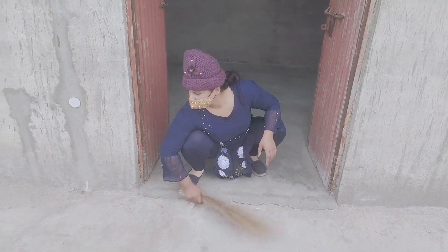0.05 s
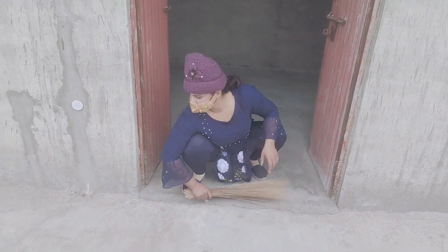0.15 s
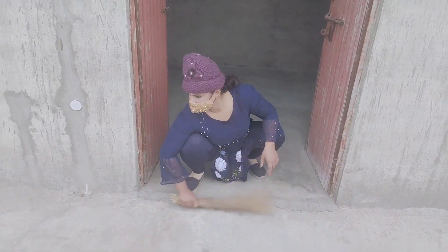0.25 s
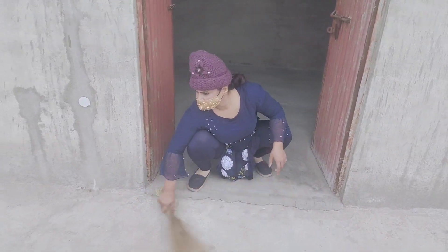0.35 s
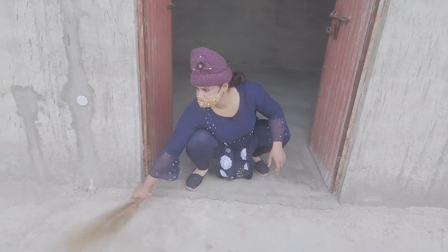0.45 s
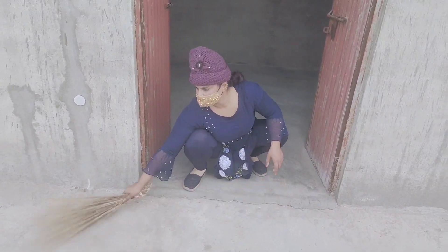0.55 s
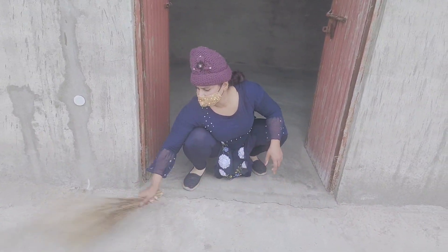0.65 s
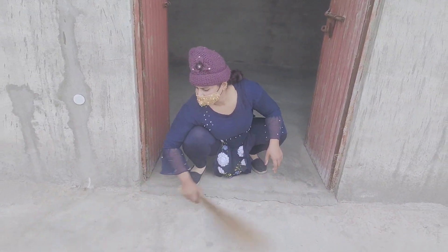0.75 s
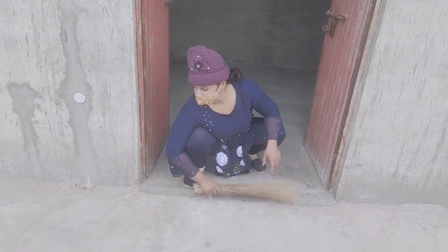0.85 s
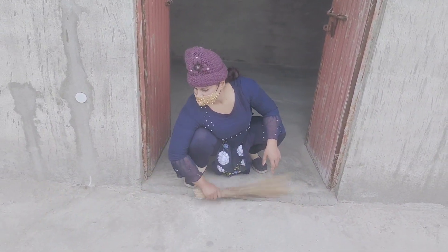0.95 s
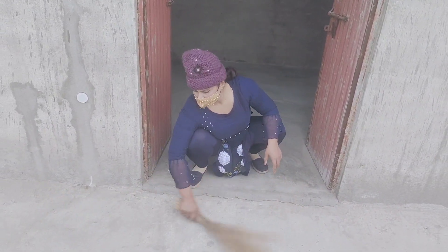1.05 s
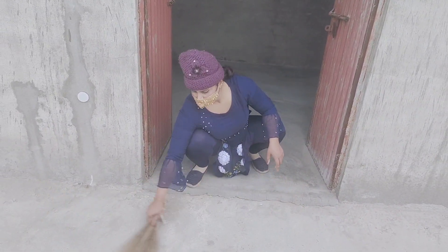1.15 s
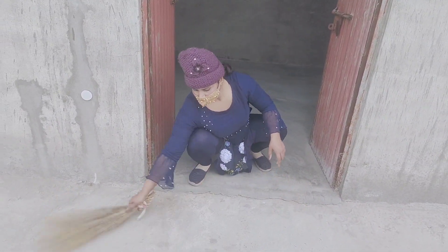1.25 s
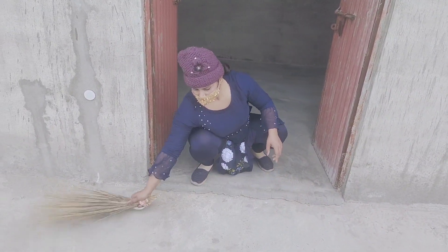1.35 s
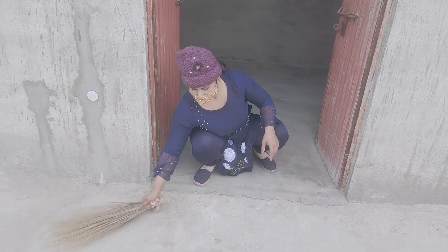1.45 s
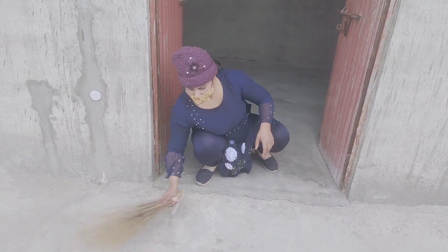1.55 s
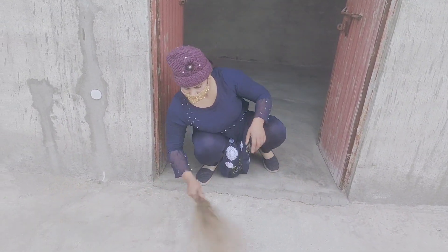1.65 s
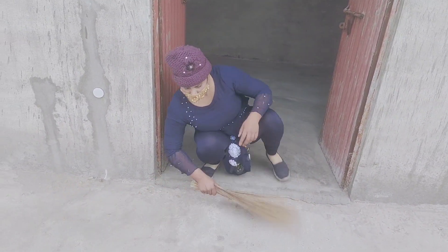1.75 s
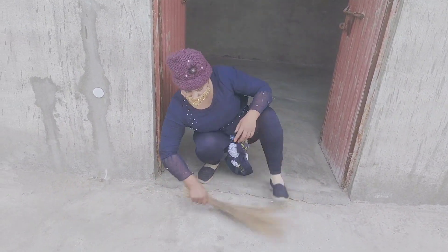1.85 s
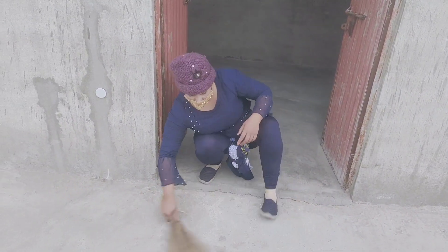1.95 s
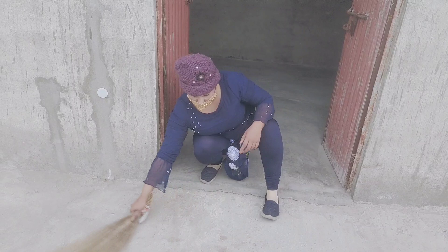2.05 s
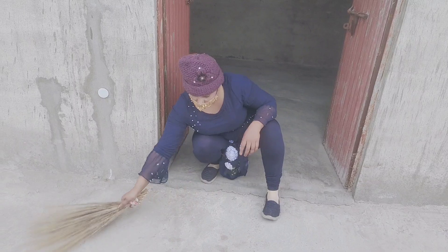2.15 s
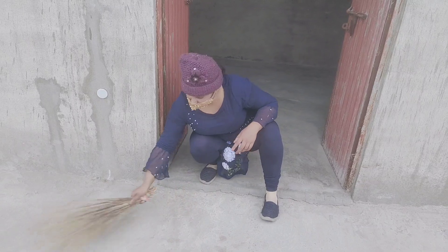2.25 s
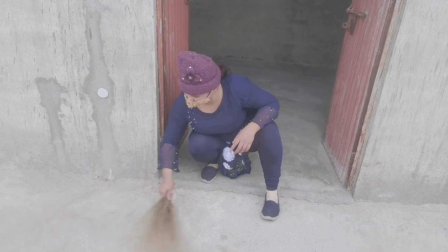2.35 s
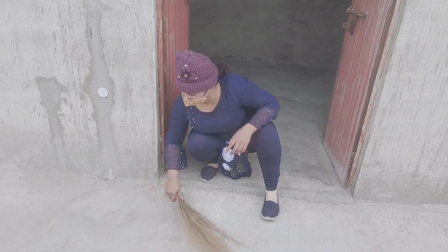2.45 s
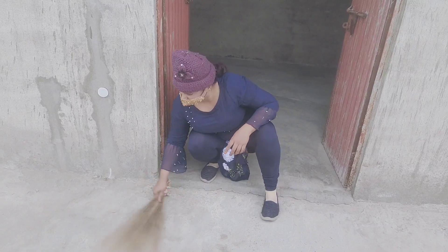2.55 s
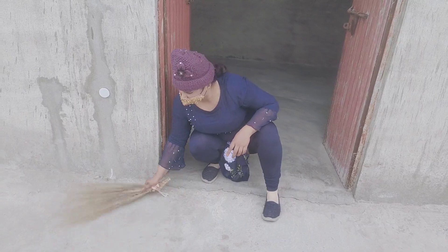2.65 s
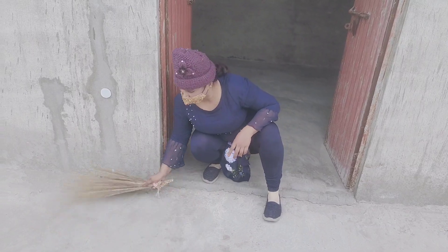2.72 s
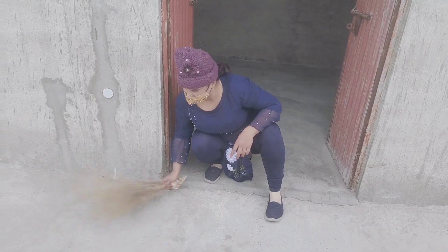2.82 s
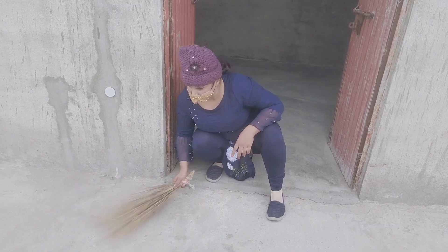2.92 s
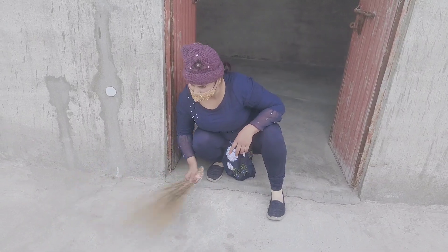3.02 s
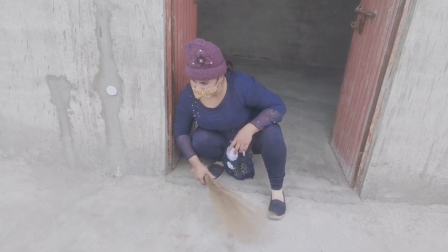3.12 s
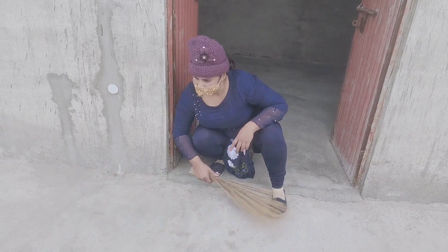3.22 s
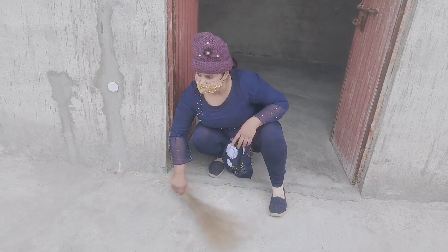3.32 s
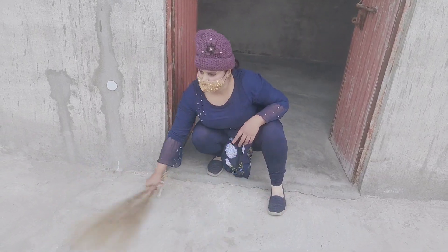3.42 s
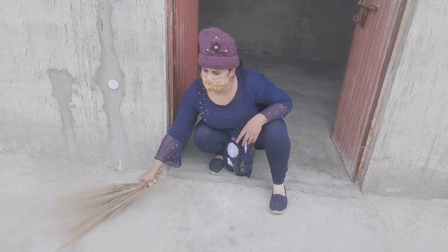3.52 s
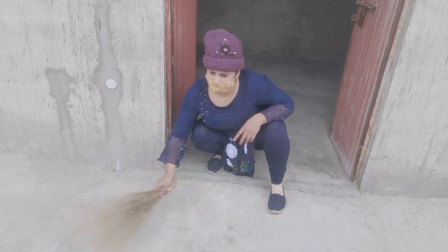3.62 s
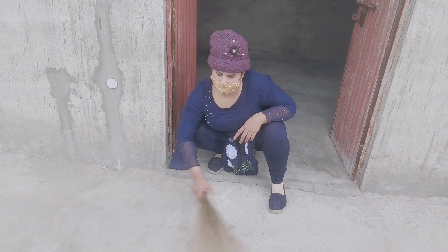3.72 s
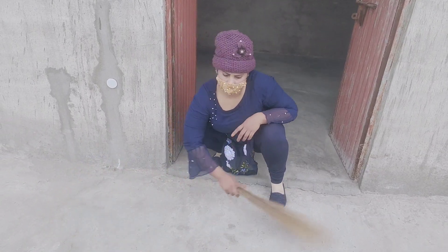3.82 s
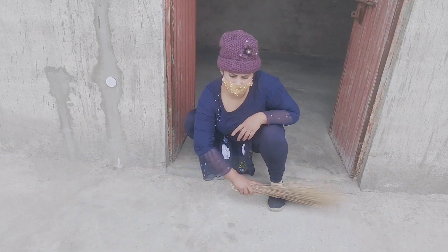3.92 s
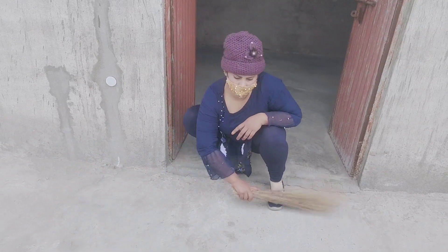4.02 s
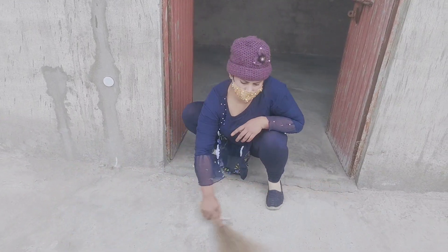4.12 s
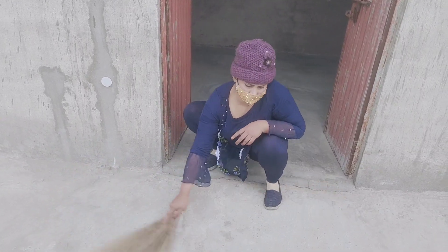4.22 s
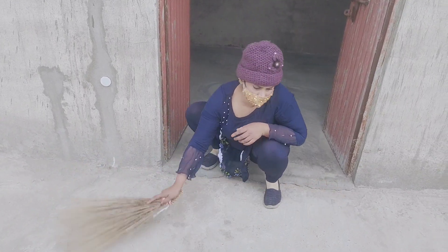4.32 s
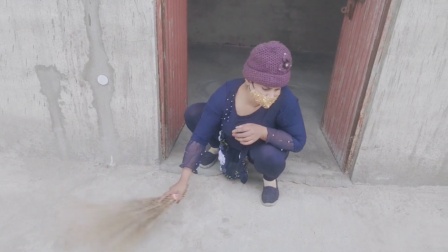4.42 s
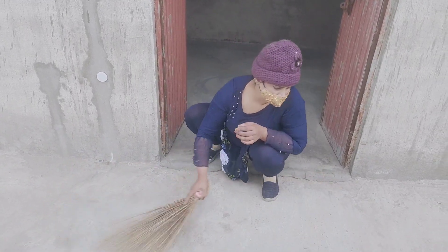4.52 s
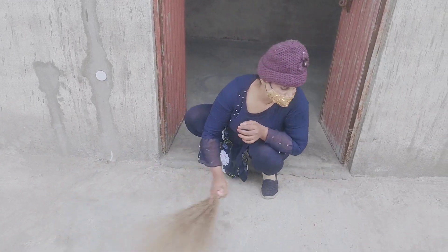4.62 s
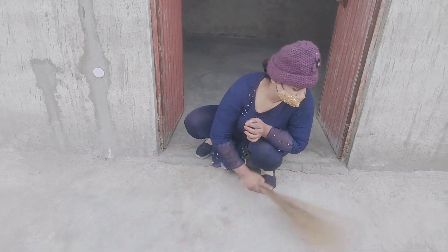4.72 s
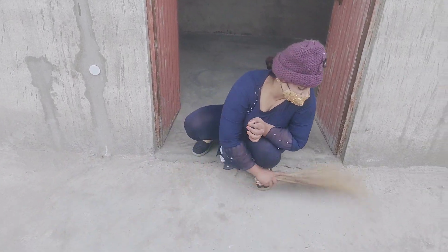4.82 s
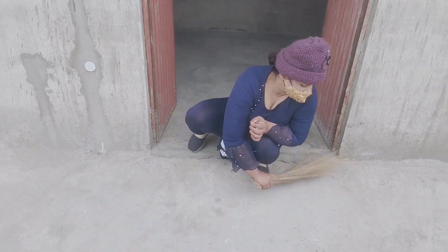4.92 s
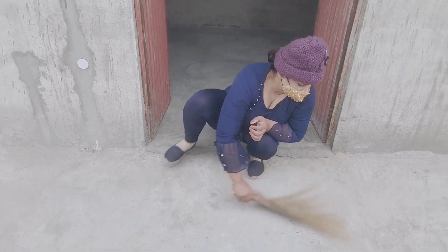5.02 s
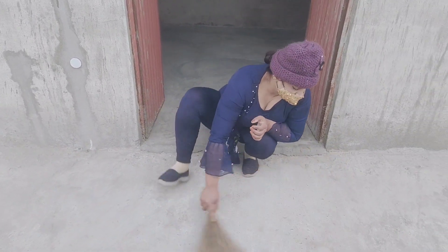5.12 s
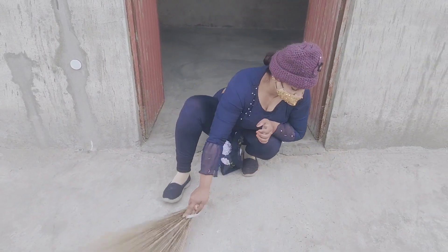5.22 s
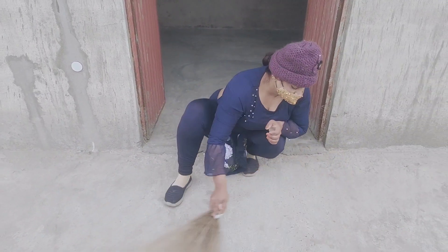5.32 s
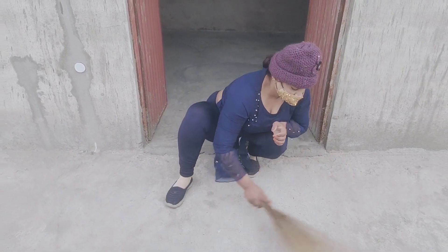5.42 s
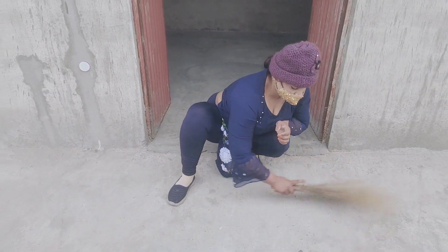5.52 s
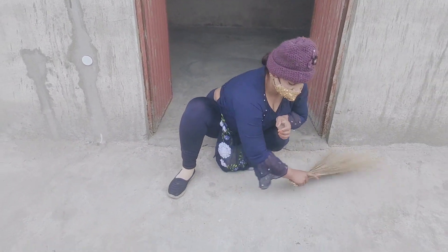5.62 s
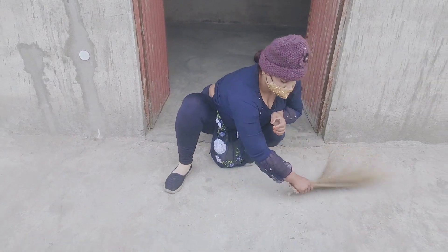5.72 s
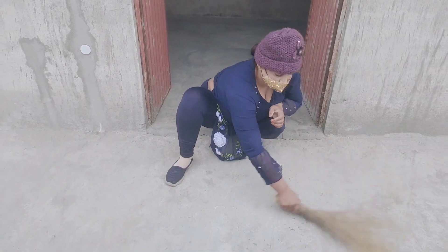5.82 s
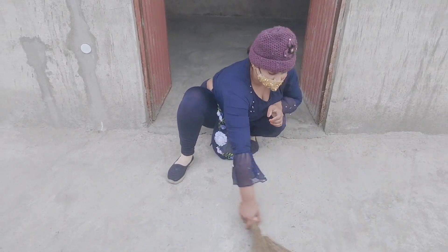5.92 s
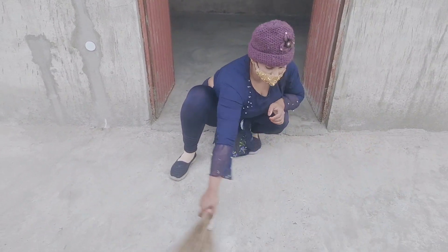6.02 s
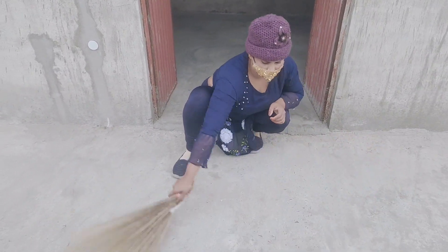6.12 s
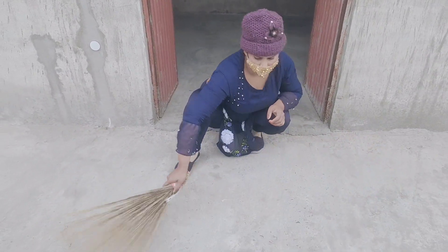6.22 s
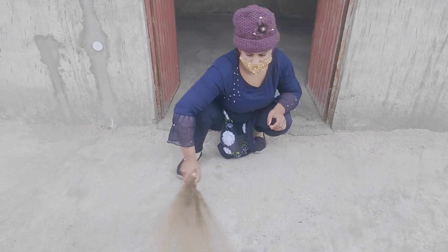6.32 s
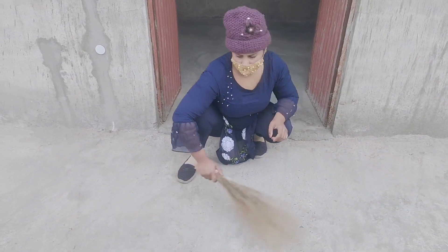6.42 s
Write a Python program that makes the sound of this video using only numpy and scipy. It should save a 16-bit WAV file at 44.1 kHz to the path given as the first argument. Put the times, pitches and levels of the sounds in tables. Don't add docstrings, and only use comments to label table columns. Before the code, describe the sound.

A hand broom of stiff twigs drags over gritty concrete by an open doorway, each stroke swelling from a light graze to a full hiss and rasp, then lifting away. Short crisp slaps and soft low scuffs fall between strokes. The stereo microphone is near, the broom slightly left, with brief wall echo, very quiet distant traffic, a wavering motor and small low wind bumps on the right.

```python
import sys
import numpy as np
from scipy import signal
from scipy.fft import rfft, irfft, next_fast_len
from scipy.io import wavfile
from scipy.ndimage import uniform_filter1d, map_coordinates

SR = 44100
rng = np.random.default_rng(int(sys.argv[2]) if len(sys.argv) > 2 else 0)


def waveform_to_disk(signal):
    frames = np.transpose(np.atleast_2d(signal))
    scaled = np.clip(frames, -1, 1) * 32767
    samples = np.round(scaled).astype(np.int16)
    wavfile.write(sys.argv[1], SR, samples)


def volts(x):
    e = np.asarray(x, float) / 20
    return 10 ** e


N = 284886

# f/Hz, density/dB per Hz
TOWN_SPECTRUM = [(15, -46), (25, -33), (72, -6.5), (113, 1.5), (450, -5.5), (574, -8), (693, -7.5),
                 (1440, -13.5), (1830, -13), (2980, -22.5), (3600, -23.5), (13500, -31), (14700, -29),
                 (15900, -51)]
# f/Hz, correlation
TOWN_LIKENESS = [(60, 0.92), (180, 0.99), (550, 0.46), (1650, -0.23), (4970, 0.047), (15000, -0.27)]
# t/s, f/Hz, level/dB
MOTOR_WHINE = [
    (0, 734, -63),
    (.6, 735, -60.5),
    (1.2, 708, -63),
    (1.6, 709, -58),
    (2.2, 700, -65),
    (3.2, 712, -68),
    (4.5, 703.6, -86),
    (6, 740, -78),
    (6.4, 760, -54),
]
# t/s, level/dB
GUSTS = [(0, -69), (.6, -71), (1, -61), (1.4, -64), (1.8, -73), (2.9, -69), (3.7, -70), (4.2, -58),
         (4.7, -69), (5, -79), (6, -78), (6.4, -68)]
# t/s, peak level/dB, f/Hz
WIND_POPS = [(0.088, -46, 117), (0.688, -47, 105), (0.929, -50, 125), (0.959, -53, 78.1), (0.999, -61, 214),
             (1.136, -40.5, 112), (4.179, -53, 94), (4.232, -43, 107), (4.516, -45, 132),
             (4.603, -42.5, 104), (4.731, -44, 103)]
# f/Hz, T60/s
WALL_T60 = [(200, 0.98), (2000, 0.64), (6000, 0.39), (14000, 0.25)]
CASING_ECHOES = [(5.2, -0.19), (6.1, 0.045)]

# f/Hz, width/Hz, level/dB
TIP_MODES = [(6870, 1120, 2), (10000, 2650, -2.5)]
# f/Hz, width/Hz, level/dB
GRIT_MODES = [(10540, 7000, -3), (13870, 1570, 4), (14630, 3400, -3)]
# f/Hz, width/Hz, level/dB
TWIG_MODES = [(1803, 200, -2), (2608, 324, 0.5), (3447, 810, 0), (5090, 2260, -3)]
# f/Hz, width/Hz, level/dB
BUNDLE_MODES = [(319, 158, -1), (744, 162, -2), (1390, 710, -3)]
# t/s, rms level/dB, f/Hz, length/s
THUDS = [(0.297, -39.5, 1140, 0.046), (0.311, -48, 262, 0.049), (1.043, -49.5, 297, 0.045),
         (1.067, -44.5, 1060, 0.054), (1.964, -43, 324, 0.053), (1.969, -44, 606, 0.063),
         (2.658, -48, 800, 0.042), (2.898, -49.5, 230, 0.045), (3.382, -52, 294, 0.045),
         (3.93, -52, 2600, .012), (5.128, -48, 328, 0.098), (5.863, -51.5, 390, .12)]

# touch-down t/s, graze level/dB, creep/dB per s,
# left-port lag at touch/samples, at lift/samples
TOUCHES = [
    (.159, -52.5, 53, 2, 4.7),
    (.874, -51, 21, -2, 5.5),
    (1.821, -57.5, 109, 1, 5.7),
    (2.459, -54, 31, 3.5, 4.6),
    (3.249, -55.5, 102, .5, 9.6),
    (3.956, -51, -40, -3.5, 3.8),
    (4.887, -54.5, 40, -4.5, 2.2),
    (5.635, -55, -23, -5, 3.4),
]
# crest after touch/s, crest level/dB, rise from -20 dB/s, fall to -20 dB/s
DRAGS = [
    (0.26, -30.5, 0.15, 0.17),
    (0.297, -30, 0.18, 0.19),
    (0.23, -31, 0.16, 0.17),
    (0.144, -31, 0.1, 0.135),
    (0.19, -30.0, 0.11, 0.109),
    (0.26, -32, 0.18, 0.15),
    (0.23, -29.5, 0.1353, 0.2),
    (0.4, -32.5, 0.3, 0.18),
]
# rise flatness, fall flatness (over 2: flat crest, steep flank), grit level/dB, twig level/dB
GRIPS = [(7.3, 3.9, 0.3, 0.51), (3.2, 3.75, -0.61, -0.18), (3.1, 3.1, 0.19, -0.064), (2.4, 5.6, 1.1, 0.86),
         (3.1, 2.5, 1.6, 1.4), (2.6, 3.85, -0.22, 0.99), (1.87, 2.42, -1.6, -0.43), (4.4, 2.7, -1.3, -0.87)]
# t/s, level/dB, grit level/dB, fade/dB per s, shiver level/dB
SLAPS = [
    (1.445, -27, 2, 450, -19),
    (2.892, -26, 3.5, 517, -19),
    (4.487, -34.5, 2.5, 344, -15.5),
]
# t/s, level/dB, half length/s
BRUSHES = [(.022, -64, .062), (.095, -68, .034), (1.432, -52.5, .024), (2.337, -62, .013),
           (2.448, -66, .027), (2.888, -57, .02), (3.164, -71, .013), (3.623, -51.5, .049),
           (4.484, -58, .012), (4.688, -65, .02), (6.313, -57.5, 0.029)]
GRIT_SHARES = [0.2, 2.5, -0.7, 3.5, 0, 3]
TWIG_SHARES = [0.53, -0.78, -1.1, 0.47, -1.2, 1.8]
BUNDLE_SHARES = [-12.5, -17, -10.5, -13.5, -17, -17]


def unit(x):
    return x / np.sqrt(np.mean(x ** 2) + 1e-20)


def along(points, hz):
    f, v = np.transpose(points)
    return np.interp(np.log(hz + 1), np.log(f + 1), v)


def curves(rows):
    s, *cols = np.transpose(rows)
    return [np.interp(np.arange(N) / SR, s, c) for c in cols]


def wobble(rate_hz):
    knots = rng.standard_normal(int(N * rate_hz / SR) + 4)
    return map_coordinates(knots, [np.arange(N) * rate_hz / SR])


def filtered(x, response):
    m = next_fast_len(N + 8192)
    return irfft(rfft(x, m) * response(np.fft.rfftfreq(m, 1 / SR)), m)[..., :N]


def resonances(modes, steep):
    low_hz = modes[0][0] * steep

    def response(f):
        total = 0
        for k, (center, width, db) in enumerate(modes):
            damping = 1j * f * width
            total = total + (-1) ** k * volts(db) * damping / (center * center - f * f + damping)
        return total * (1j * f / (low_hz + 1j * f)) ** 2

    return response


def patchy(x, depth_db, bins, frames):
    z = signal.stft(x, nperseg=512)[2]
    field = uniform_filter1d(rng.standard_normal(z.shape[1:]), bins, 0)
    field = uniform_filter1d(field, frames, 1)
    return signal.istft(z * volts(depth_db * unit(field)), nperseg=512)[1][:, :N]


def town():
    pair = patchy(rng.standard_normal((2, N)), depth_db=1.67, bins=2, frames=24)

    def mid_side(hz):
        turn = np.arccos(np.clip(along(TOWN_LIKENESS, hz), -1, 1)) / 2
        return volts(along(TOWN_SPECTRUM, hz)) * [np.cos(turn), np.sin(turn)]

    mid, side = filtered(pair, mid_side)
    traffic = volts(-54 + 0.61 * wobble(4.2)) * unit(np.array([mid + side, mid - side]))
    hz, db = curves(MOTOR_WHINE)
    phase = 2 * np.pi * np.cumsum(hz + 18 * wobble(45)) / SR
    whine = volts(db + 0.5 + 3.2 * wobble(14)) * np.sin(phase + [[0], [2.1]])
    return traffic + whine


def wind():
    lumps = volts(3 * np.array([wobble(8), wobble(8)])) * rng.standard_normal((2, N))
    gust_db, = curves(GUSTS)
    rumble = unit(filtered(lumps, resonances([(94, 29, 0)], 0.42)))
    out = volts(gust_db + [[-7], [0]]) * rumble
    t = np.arange(SR // 30) / SR
    for s, db, hz in WIND_POPS:
        pop = np.sin(2 * np.pi * hz * t) * np.exp(-((t - .011) / 0.0088) ** 2)
        out[:, round(s * SR):][:, :len(t)] += volts(db + np.array([[-12], [3]])) * pop
    return out


def walls(x):
    step, delay = SR // 10, 300
    out = np.zeros((2, N + SR))
    for start in range(0, N, step):
        hz, t, z = signal.stft(rng.standard_normal((2, SR * 2 // 3)), SR, nperseg=256)
        decay = volts(-60 * t / along(WALL_T60, hz)[:, None])
        tail = signal.istft(z * decay, SR, nperseg=256)[1]
        answer = signal.fftconvolve(x[:, start:start + step], tail / np.linalg.norm(tail[0]), axes=1)
        out[:, start + delay:][:, :answer.shape[1]] += answer
    return out[:, :N]


def doorpost(right):
    lag, gain, dull_hz = 43, .45, 4500
    return filtered(right, lambda hz: gain * np.exp(-2j * np.pi * hz * lag / SR) / (1 + (hz / dull_hz) ** 4))


def thuds():
    out, t = np.zeros(N), np.arange(SR // 3) / SR
    for s, db, hz, length_s in THUDS:
        band = signal.butter(1, [hz * 0.93, hz * 1.2], "band", fs=SR)
        rumble = unit(signal.lfilter(*band, rng.standard_normal(len(t))))
        envelope = (1 - np.exp(-t / 0.009)) * np.exp(-(t / length_s) ** 2)
        out[round(s * SR):][:len(t)] += volts(db) * rumble * envelope
    return out


def contact():
    touch_s, slap_s = .006, .009
    settle_db, settle_db_per_s = -1.3, 96
    shiver_db_per_s, slap_lag = 78, 4.4
    t = np.arange(0, N / SR, .001)

    def onset(since, rise_s):
        return 1 - np.exp(-np.maximum(since, 0) / rise_s)

    touch, graze_db, creep, lag_in, lag_out = np.transpose(TOUCHES)[:, :, None]
    after, crest_db, rise, fall = np.transpose(DRAGS)[:, :, None]
    flat_in, flat_out, grit_db, twig_db = np.transpose(GRIPS)[:, :, None]
    since = t - touch - after
    phase = since / np.where(since < 0, rise, fall)
    landed = onset(t - touch, touch_s) ** 2
    drag = volts(crest_db - 20 * np.abs(phase) ** np.where(since < 0, flat_in, flat_out)) * landed
    graze = volts(graze_db + creep * np.minimum(t - touch, after)) * landed * (since < 0)
    settle = volts(crest_db + settle_db - settle_db_per_s * np.abs(since)) * onset(since, fall)

    at, slap_db, slap_grit_db, fade, shiver_db = np.transpose(SLAPS)[:, :, None]
    slap = volts(slap_db + 6 - fade * np.abs(t - at)) * onset(t - at, slap_s) ** 3
    shiver = volts(slap_db + shiver_db - shiver_db_per_s * np.abs(t - at)) * onset(t - at, slap_s)
    mid, brush_db, half = np.transpose(BRUSHES)[:, :, None]
    brush = volts(brush_db - 10 * ((t - mid) / half) ** 2)

    def part(shares_db, grows_db, drag_db=0, hit_db=0):
        grown = drag * volts(grows_db * np.clip(phase, -1, 1) + drag_db)
        moves = [graze, grown, settle, slap * volts(hit_db), shiver, brush]
        power = sum(volts(2 * db) * (m ** 2).sum(axis=0) for db, m in zip(shares_db, moves))
        return 10 * np.log10(power + 1e-12)

    levels = [part(np.zeros(6), 0), part(GRIT_SHARES, 0.6, grit_db, slap_grit_db),
              part(TWIG_SHARES, 0.2, twig_db), part(BUNDLE_SHARES, -1.5)]
    lift = touch + after + fall / 2
    swing = [*zip(touch[:, 0], lag_in[:, 0]), *zip(lift[:, 0], lag_out[:, 0])]
    swing += [(s, slap_lag) for s in at[:, 0]]
    return curves(np.transpose([t, *levels])), curves(sorted(swing))[0]


def slips(lag, modes, steep, spread, scatter_db, count):
    when, sign, place, big = rng.random((count, 4)).T
    at = when * (N - 1)
    size = (sign - .5) * volts(-scatter_db * np.log(1 - big))
    delay = lag[at.astype(int)] + spread * (2 * place - 1)
    taps = np.arange(-6, 7)
    window = np.hanning(len(taps) + 2)[1:-1]
    ports = []
    for side in (.5, -.5):
        arrive = at + side * delay
        index = np.round(arrive)[:, None] + taps
        pulse = np.sinc(index - arrive[:, None]) * window * size[:, None]
        index = np.clip(index, 0, N - 1).astype(int)
        ports.append(np.bincount(index.ravel(), pulse.ravel(), N))
    return unit(filtered(np.array(ports), resonances(modes, steep)))


def broom():
    (tip_db, grit_db, twig_db, bundle_db), lag = contact()
    flutter_db = 0.5 * wobble(30) + 0.27 * wobble(150)
    tip_db = tip_db + flutter_db - 1.0
    grit_db = grit_db + flutter_db + 2.0
    twig_db = twig_db + flutter_db - 1.0 + 0.52 * wobble(30)
    bundle_db = bundle_db + flutter_db + 0.39 * wobble(25)
    tips = volts(tip_db) * slips(lag, TIP_MODES, 0.9, spread=2, scatter_db=1.5, count=90000)
    grit = volts(grit_db) * slips(lag, GRIT_MODES, 1.0, spread=1.6, scatter_db=1.2, count=110000)
    twigs = volts(twig_db) * slips(lag, TWIG_MODES, 0.97, spread=3.6, scatter_db=0.0, count=70000)
    bundle = volts(bundle_db) * slips(lag, BUNDLE_MODES, 0.77, spread=7, scatter_db=2.0, count=20000)
    return patchy(tips + grit + twigs + bundle, depth_db=1.16, bins=3, frames=5)


def scene():
    sweep = broom() + thuds()
    direct = sweep * volts([[.45], [-.45]])
    post = doorpost(sweep[1]) * [[1], [0]]
    thin = filtered(sweep, lambda hz: 1j * hz / (450 + 1j * hz))
    return direct + post + volts(-5.5) * walls(thin) + town() + wind()


def roll_off(x):
    return signal.sosfilt(signal.butter(12, 15570, fs=SR, output="sos"), x)


def record(dry):
    lag, gain = np.transpose(CASING_ECHOES)[:, :, None]
    top_hz = 15780

    def ports(hz):
        comb = 1 + gain * np.exp(-2j * np.pi * hz * lag / SR)
        return comb / (1 + (hz / top_hz) ** 300)

    return roll_off(filtered(dry, ports))


dry = scene()
out = record(dry)
waveform_to_disk(out)
```